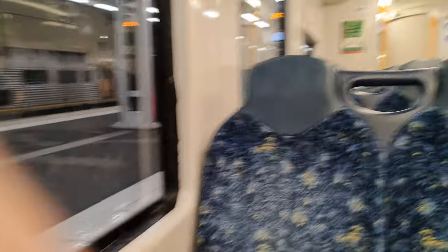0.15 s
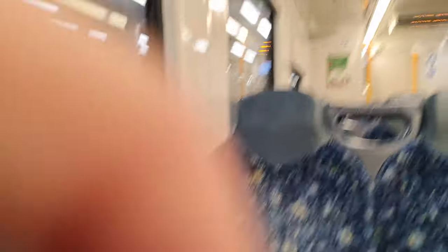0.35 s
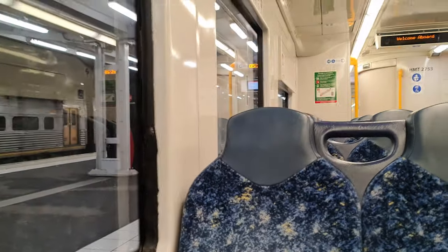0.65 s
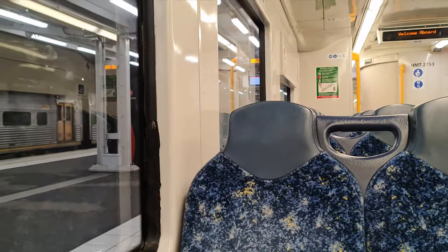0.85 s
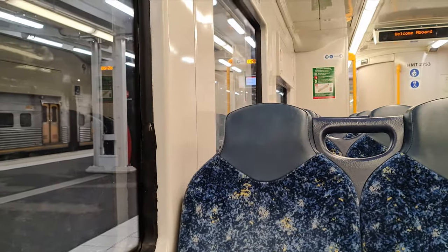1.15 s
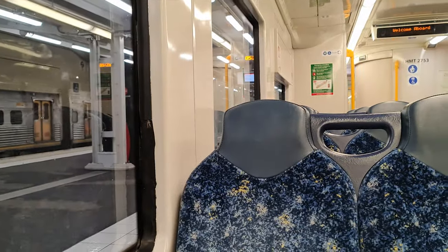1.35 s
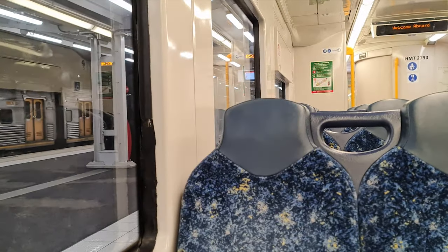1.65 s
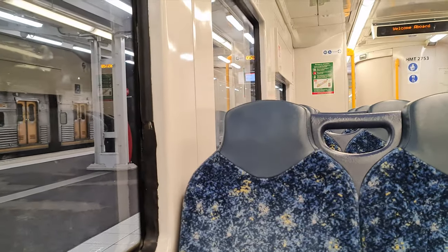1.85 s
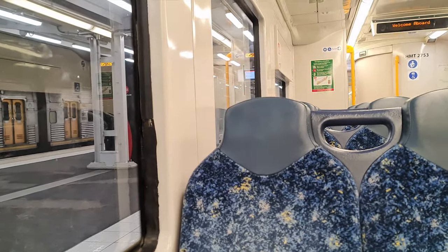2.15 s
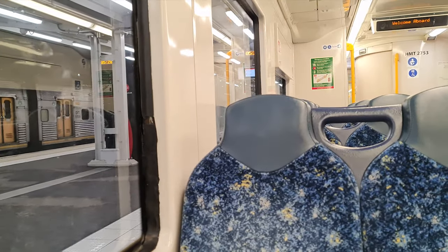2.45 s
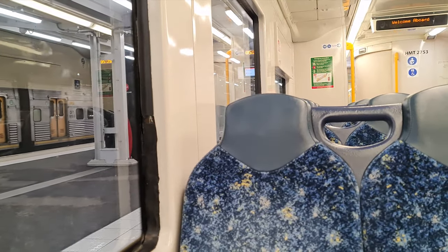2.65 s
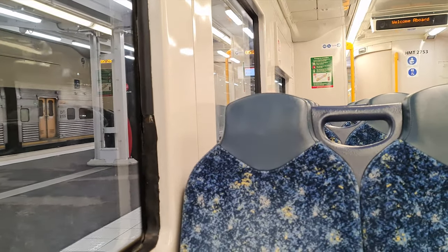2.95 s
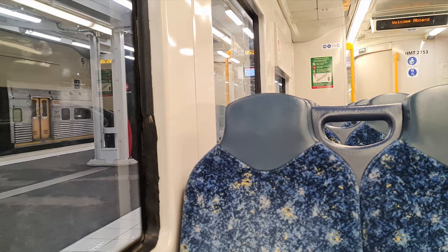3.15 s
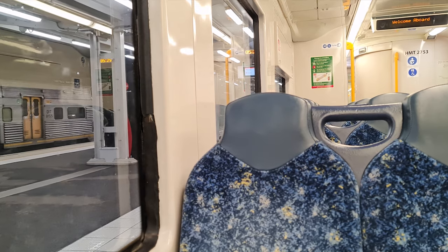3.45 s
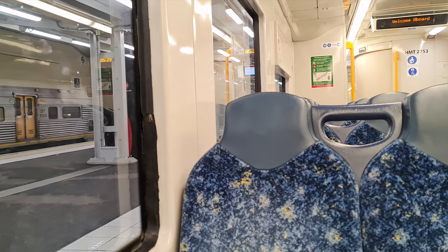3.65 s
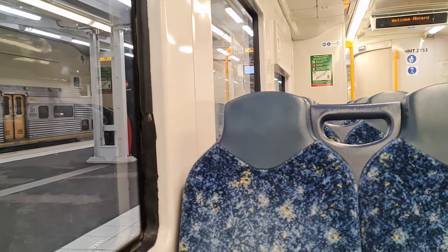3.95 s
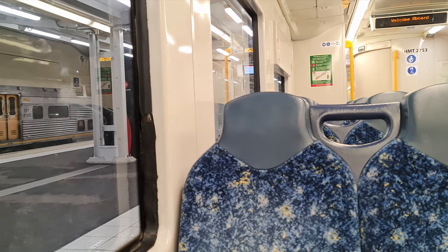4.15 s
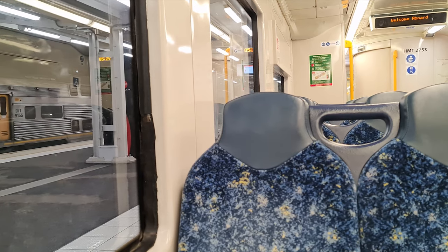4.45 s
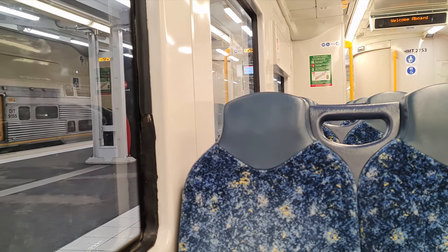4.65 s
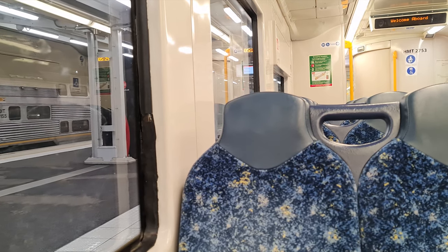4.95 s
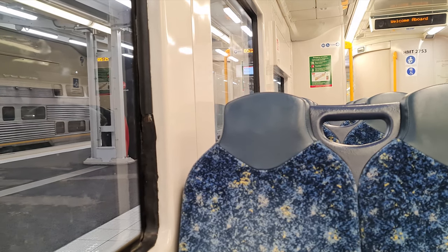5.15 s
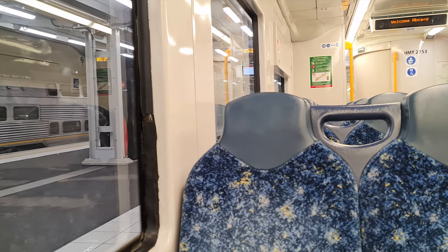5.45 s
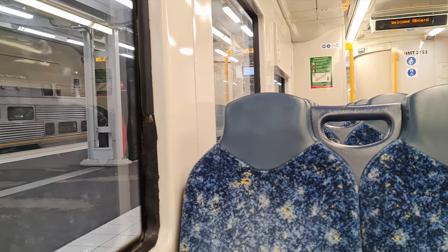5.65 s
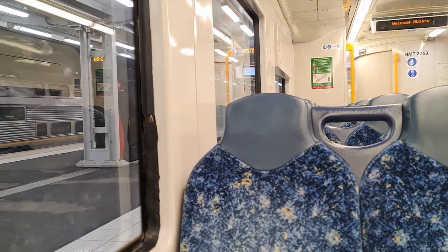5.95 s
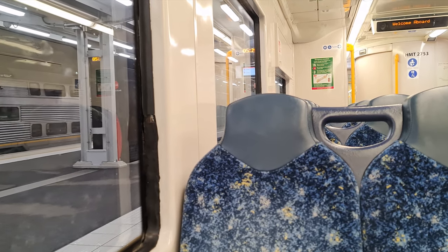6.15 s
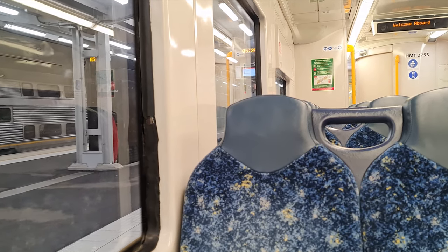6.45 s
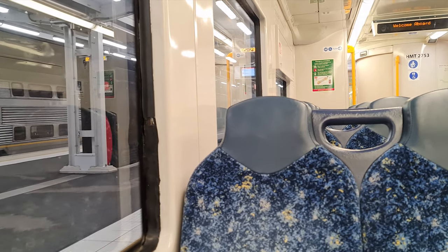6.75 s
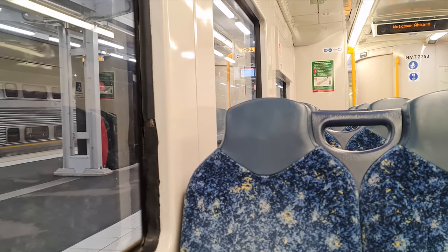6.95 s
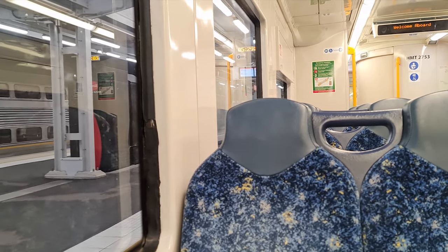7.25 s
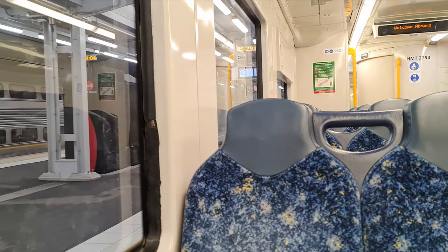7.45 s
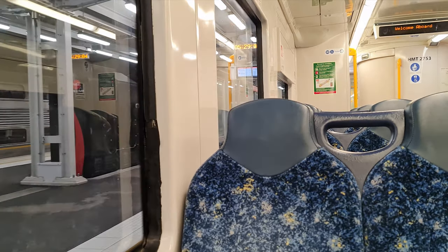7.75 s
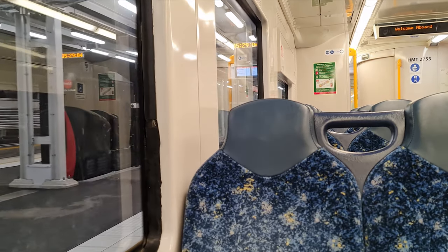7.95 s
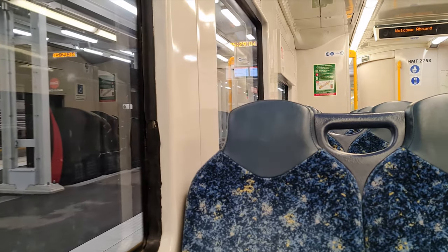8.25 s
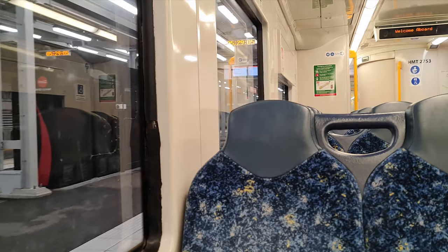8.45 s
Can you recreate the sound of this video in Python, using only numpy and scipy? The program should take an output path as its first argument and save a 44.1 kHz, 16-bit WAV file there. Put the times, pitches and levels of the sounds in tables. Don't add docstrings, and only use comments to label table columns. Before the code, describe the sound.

A diesel railcar idles with a lumpy low rumble, bogs briefly, then revs into a steady loud drone, ending on a short air-valve blast.

```python
import sys
import numpy as np
from scipy import signal
from scipy.fft import rfft, irfft
from scipy.io import wavfile
from scipy.ndimage import uniform_filter1d

SR = 44100
rng = np.random.default_rng(int(sys.argv[2]) if len(sys.argv) > 2 else 0)


def natural_amplitude(level_db):
    exponent = np.asarray(level_db, float) / 20
    return 10 ** exponent


def store_pcm(level_fs):
    pcm = np.round(np.clip(level_fs, -1, 1) * 32767).astype(np.int16)
    wavfile.write(sys.argv[1], SR, np.atleast_2d(pcm).T)


N = 378378
T = np.arange(N) / SR
HZ = np.maximum(np.arange(N // 2 + 1) * SR / N, 1)
VALVE_S = 8.353


def curves(rows):
    s, *columns = np.transpose(rows)
    return [np.interp(T, s, column) for column in columns]


def along(rows, hz=HZ):
    f, value = np.transpose(rows)
    return np.interp(np.log(hz), np.log(np.maximum(f, 1)), value)


def ramp(s, length):
    return np.clip((T - s) / length, 0, 1)


def swells(rows):
    return sum(natural_amplitude(db) * np.exp(-((T - s) / half) ** 2) for s, db, half in rows)


def fade(s, attack, t60):
    i = np.arange(int(s * SR), min(N, int((s + attack + t60) * SR)))
    t = i / SR - s
    return i, np.clip(t / attack, 0, 1) * natural_amplitude(-60 * np.maximum(t - attack, 0) / t60)


def walk(rate):
    k = int(SR / rate)
    steps = np.repeat(rng.standard_normal(N // k + 1), k)
    w = uniform_filter1d(uniform_filter1d(steps, k), k)[:N]
    return w / w.std()


def hump(hz, width):
    return 1 / np.sqrt(1 + ((HZ - hz) * 2 / width) ** 2)


def pan(db):
    return natural_amplitude(np.array([db / 2, -db / 2])).reshape(2, -1)


# frequency in Hz, likeness from 0 to 1.
PORTS_ALIKE = [(60, 1), (130, 0.97), (290, 0.93), (640, 0.33), (1410, 0.46), (3100, 0.06), (6820, -0.0),
               (15000, 0.04)]
# frequency in Hz, lead in radians.
LEFT_LEAD = [(0, 0.18), (780, 0.21), (1290, 2.01), (1550, 3.7), (3190, 9.5), (4570, 8.5), (6200, 16),
             (8100, 33), (9130, 35), (10200, 25), (10400, 25), (11500, 39), (14500, 19.5), (15500, 18)]
# frequency in Hz, left minus right in dB.
LEFT_TILT = [(60, 2), (110, 2.5), (200, 8.5), (380, -1.5), (700, 0), (1290, 1), (2380, 2.5), (4400, -3.5),
             (8120, -3.5), (15000, -1.5)]


def white():
    shared, own = rfft(rng.standard_normal((2, N)))
    alike = np.clip((along(PORTS_ALIKE) - .3) / 0.73, 0, 1) ** .5
    right = (alike * shared + np.sqrt(1 - alike ** 2) * own) * np.exp(-1j * along(LEFT_LEAD))
    return np.array([shared, right]) * natural_amplitude(np.outer([.5, -.5], along(LEFT_TILT)))


def noise(gain):
    x = irfft(white() * gain, N)
    return x / x.std()


# time in seconds, cylinder firings per second in Hz.
SPEED = [(0, 42.45), (1.9, 42.45), (2.2, 42.75), (2.5, 42.5), (2.9, 42.4), (3.3, 41.4), (3.65, 40.42),
         (3.8, 42.15), (3.9, 45.42), (4.2, 53.4), (4.6, 59.7), (4.75, 61.05), (5.05, 62.6), (5.4, 62.8),
         (5.8, 62.27), (6.1, 62.4), (6.8, 62.5), (8.58, 62.47)]
# time in seconds, shaking of the floor in dB.
SHAKE = [(0, -12), (.3, 4.5), (.6, -0.5), (.95, 2.5), (1.25, -4.5), (1.5, 6.5), (1.8, -10), (2.15, 3.5),
         (2.5, -1.5), (3.45, 3), (3.7, -11), (4.25, 2.5), (4.45, -0.5), (4.53, -5), (4.97, -1),
         (5.22, -6.5), (5.45, -2.1), (8.58, -1.5)]
# level in dB of the firing rate, its double and its triple.
IDLE_FIRING_DB = (-40.5, -35, -41)
PULL_FIRING_DB = (-17.5, -31, -35.5)
SHAKEN_SHARES = (1.0, 0.55, .2)
# multiple of the whole-cycle rate, level in dB.
IDLE_ORDERS = [(1, -46), (2, -39), (3, -30), (4, -18), (5, -12), (7, -14), (8, -3), (9, 3), (10, 2.5),
               (11, -8), (13, -16), (14, -27), (15, -15), (16, -19), (17, -14), (19, -21), (20, -19),
               (21, -19), (22, -29), (23, -27), (24, -16), (25, -27), (26, -30), (27, -27), (28, -22),
               (30, -29), (34, -30), (38, -31), (39, -32), (46, -24)]
PULL_ORDERS = [(2, -35), (3, -13), (4, -30), (5, -6), (7, -18), (8, -18), (9, -17), (10, -25), (11, -24),
               (13, -24), (14, -13), (15, -26), (16, -21), (17, -27), (19, -32), (20, -25), (23, -36),
               (24, -25), (26, -40), (27, -29), (28, -25), (30, -23), (32, -31), (33, -31), (34, -33),
               (36, -31), (38, -33)]
# multiple of the whole-cycle rate, level in dB.
GEAR_ORDERS = [(42, -28), (45, -32), (46, -31), (48, -37), (52, -40), (54, -40), (57, -39), (58, -38),
               (60, -40), (68, -38), (72, -37), (76, -42), (78, -37), (81, -32), (84, -40), (90, -43),
               (94, -41), (99, -43), (102, -46), (114, -45), (123, -45), (126, -46), (141, -44), (144, -48),
               (162, -46), (164, -42), (165, -41), (166, -43), (169, -44)]


def engine():
    sparse = 10
    idle_lump_db, pull_lump_db, asleep_db = -30.5, -20.5, -31
    idle_turns, idle_lag, pull_turns = .41, .25, .24
    rock_lag = .6
    floor_hz, floor_half_width_hz = 67, 4
    throttle_s = 3.68

    hz, shake_db = curves(SPEED)[0], curves(SHAKE)[0]
    cycle = 2 * np.pi * np.cumsum(hz) / (6 * SR)
    load, punch, bark = ramp(throttle_s, 1), ramp(3.88, 0.18), ramp(3.75, .25)
    turning = cycle, load
    bog_db = -15 * np.exp(-((T - 3.45) / 0.21) ** 2)
    miss_db = -11 * np.exp(-((T - 3.91) / .06) ** 2)
    slack_db = -15 * (1 - ramp(5.05, 0.14))
    idle_db = miss_db + idle_lump_db + asleep_db * ramp(4.1, 0.72)
    pull_db = miss_db + shake_db + pull_lump_db + asleep_db * (1 - ramp(throttle_s, 0.19))
    firing_db = [idle + bog_db + (share * shake_db + pull - idle) * rise
                 for idle, pull, share, rise
                 in zip(IDLE_FIRING_DB, PULL_FIRING_DB, SHAKEN_SHARES, (punch, bark, bark))]
    scatter = [walk(4) for _ in range(8)]
    paths = rng.uniform(-np.pi, np.pi, 200) * (np.arange(200) > 12)

    signals = np.array([hz, cycle, idle_db, pull_db, shake_db, slack_db, bog_db])
    hz, cycle, idle_db, pull_db, shake_db, slack_db, bog_db = signals[:, ::sparse]
    firing_db, scatter = np.array(firing_db)[:, ::sparse], np.array(scatter)[:, ::sparse]

    def line(k, db, turns, lag, wobble_db):
        k = int(round(k))
        angle = k * cycle - 2 * np.pi * (k * turns + lag)
        angle = angle + paths[k] * (k % 6 > 0) + .1 * scatter[(k + 3) % 8]
        return np.sqrt(2) * natural_amplitude(db + wobble_db * scatter[k % 8]) * np.cos(angle)

    def detune(k):
        return (k * hz / 6 - floor_hz) / floor_half_width_hz

    def boom_db(k, index):
        return 10 * np.log10((1 + detune(k)[index] ** 2) / (1 + detune(k) ** 2))

    casing_db = -150 * np.clip(1 - hz / hz[-1], 0, 1)

    def path_db(k):
        if k < 6:
            return slack_db * (6 - k) / 3
        if k < 10:
            return .6 * boom_db(k, index=-1)
        return .6 * casing_db

    out = sum(line(6 * (k + 1), db, pull_turns, 0, .5) for k, db in enumerate(firing_db))
    for k, db in IDLE_ORDERS:
        level_db = db + idle_db + (1 if k > 8 else .6) * boom_db(k, index=0)
        level_db = level_db + shake_db * (k in (9, 10)) + 0.71 * bog_db * (k == 9)
        out += line(k, level_db, idle_turns, idle_lag + np.arctan(detune(k)) / (2 * np.pi), 1.5)
    for k, db in PULL_ORDERS:
        out += line(k, db + pull_db + path_db(k), pull_turns, rock_lag * (k < 4), 0.61)
    for k, db in GEAR_ORDERS:
        out += line(k, db + pull_db + casing_db, 0, 0, 2.5)
    drone = signal.resample_poly(out, sparse, 1, window=("kaiser", 10), padtype="antireflect")[:N]
    return drone * pan(-.2), *turning


# frequency in Hz, level in dB per Hz.
IDLE_ROAR = [(12, -41.5), (25, -17), (45, -4), (64, 6), (100, -5), (220, -13.5), (500, -18), (1000, -25),
             (1600, -27), (2300, -34.5), (3300, -40.5), (4200, -50.5), (6500, -67), (11800, -71),
             (12200, -115)]
PULL_ROAR = [(12, -47), (25, -23), (60, 1), (100, -3), (220, -16), (500, -18.5), (1000, -26), (1600, -24.5),
             (2300, -33.5), (3300, -39), (4200, -54), (6500, -71.5), (10800, -67), (12200, -115)]
# frequency in Hz, width in Hz, boost in dB.
PANELS = [(337, 33, 3), (800, 99, 2.5), (954, 39, 3.5), (1350, 60, 2), (1726, 46, 5), (3020, 89, 2)]
# time in seconds, effort in dB.
EFFORT = [
    (0, -1),
    (2.8, -0.5),
    (3.5, -1.5),
    (4.1, 0.5),
    (4.7, 2),
    (5.3, 1),
    (5.8, 0.5),
    (8.58, -.5),
]


def roar(cycle, load):
    panels = np.prod([1 + (natural_amplitude(db) - 1) * hump(f, w) ** 2 for f, w, db in PANELS], axis=0)
    out, swell = 0, walk(0.54)
    for colour, db, share in ((IDLE_ROAR, -29, 1 - load), (PULL_ROAR, -30, load)):
        spectrum, layer = white() * natural_amplitude(along(colour)) * panels, 0
        for octave in range(4, 15):
            band = np.cos(np.pi / 2 * np.clip(np.log2(HZ) - octave, -1, 1))
            layer = layer + irfft(spectrum * band, N) * natural_amplitude(0.3 * swell + 1.0 * walk(6))
        out = out + layer / layer.std() * natural_amplitude(db) * np.sqrt(share)
    throb = 1 + .07 * np.cos(6 * cycle)
    return out * natural_amplitude(curves(EFFORT)[0]) * throb


# frequency in Hz, level in dB per Hz.
JET = [(1180, -33), (2000, -12.5), (2480, -4.5), (2700, -5.5), (3380, -5), (4150, 2), (4680, 0),
       (5060, -6.5), (6010, -12.5), (7010, -21), (9000, -9), (11100, -12), (15100, -13), (15600, -21.5)]


def valve():
    def blow(db, rise, t60):
        fall_db = -60 * np.maximum(T - VALVE_S - rise, 0) / t60
        return ramp(VALVE_S, rise) ** 2 * natural_amplitude(db + fall_db)

    pipe_modes = hump(660, 120.) + 0.7 * hump(830, 120.) + 0.83 * hump(1300, 1700.0)
    pipe = noise(pipe_modes * hump(0, 5600.0) ** 2)
    jet = white() * natural_amplitude(along(JET))
    top = 1 - hump(0, 24000.) ** 6
    dulling = natural_amplitude(-110 * np.clip(T - 8.42, 0, 1))
    jet = (irfft(jet * (1 - top), N) + dulling * irfft(jet * top, N)) / irfft(jet, N).std()
    leak = natural_amplitude(-51) * ramp(8.337, .005)
    return pan(.3) * ((blow(-26, 0.014, 0.57) + leak) * jet + blow(-23, 0.02, 0.48) * pipe)


# time in seconds, peak in dB.
CHIRPS = [
    (0.1694, -63),
    (0.2394, -55),
    (0.3386, -49),
    (0.4344, -58),
    (0.5207, -59),
    (0.6185, -59),
    (0.7238, -67),
    (0.9194, -69),
    (0.9994, -80),
    (1.0794, -77),
]
# time in seconds, peak in dB, how early the rubber slips in seconds.
SQUEAK = [
    (4.4, -83.5, 0.017),
    (4.7, -64.5, 0.028),
    (5.0, -67, 0.032),
    (5.35, -55.5, 0.015),
    (6.1, -59.5, 0.0084),
    (6.8, -63, 0.008),
    (8.3, -60.5, 0.0073),
]
# time in seconds, level in dB, half length in seconds.
LOW_STRAND = [
    (5.25, 0.09, 0.27),
]


def chirps(cycle):
    hop_s, in_step_s = 5.19, 7.232
    out, hopped = np.zeros((2, N)), T > hop_s
    hz = np.where(hopped, 10420 - 170 * ramp(hop_s, .9), 9250 + 45 * T)
    share = np.where(hopped, 0.59, 0.045)
    whisper_db = np.where(hopped, -90, -87)
    angle = 2 * np.pi * np.cumsum(hz + 90 * (1.2 - share / .6) * walk(11)) / SR
    upper = noise(hump(0, 390.) ** 3) * np.cos(angle)
    partner = noise(hump(0, 360.) ** 3) * np.cos(angle - 2 * np.pi * 520 * T)
    tone = upper + share * partner
    tone += swells(LOW_STRAND) * noise(hump(9230, 250.) ** 3)

    peak_db, early = curves(SQUEAK)
    turns = np.floor((cycle - cycle[int(in_step_s * SR)]) / (2 * np.pi))
    shakes = np.flatnonzero((np.diff(turns) > 0) & (T[1:] > SQUEAK[0][0]) & (T[1:] < VALVE_S))
    scatter_db = 1 * rng.standard_normal(N // 2000)
    in_step = [(T[i] - early[i], peak_db[i] + scatter_db[i // 2000]) for i in shakes]
    for s, db in list(CHIRPS) + in_step:
        for lag, rebound_db in ((0, -4.5), (.03, -19.5)):
            i, env = fade(s + lag, 0.0076, 0.18)
            hold = 1 - np.clip((T[i] - s - 0.054) / .025, 0, .9)
            out[:, i] += natural_amplitude(db + rebound_db) * env * tone[:, i] * hold
    return out + upper * natural_amplitude(whisper_db + 3.5 * walk(9.9) + 6.7 * np.cos(cycle))


# frequency in Hz, width in Hz, level in dB.
TRIM = [(2500, 25, -11), (2950, 150, -1), (3200, 90, -4), (3580, 120, -12), (4050, 150, -16)]
# time in seconds, peak in dB, half length in seconds.
FITS = [
    (4.62, -67, 0.27),
    (5.05, -62.5, 0.18),
    (5.8, -70.5, 0.16),
    (6.05, -68, 0.11),
]
# time in seconds, slap in dB, ring after it in dB.
RATTLES = [(4.54, -58, -63), (4.637, -57, -57), (4.735, -62, -56), (4.833, -56, -64), (4.934, -44.5, -62),
           (5.03, -55.5, -49), (5.13, -64, -58), (5.23, -66, -68), (5.66, -62, -67.5), (5.82, -62, -64),
           (5.914, -54, -59.5), (6.008, -50, -57), (6.107, -54, -57), (6.2, -58, -64.5)]
# frequency in Hz, time in seconds, peak in dB,
SINGING = [
    (2510, 6.1, -59, 0.17),
    (2500, 5.5, -60, .06),
    (2700, 4.2, -61, .1),
    (1920, 5.47, -53.5, .1),
    (1910, 4.85, -57.5, .06),
    (1930, 5.3, -58, .1),
    (250, 4.7, -44, 0.081),
    (315, 4.2, -42.5, 0.15),
    (253, 4.6, -46, .1),
]


def trim(load):
    modes = sum(natural_amplitude(db + 3 * walk(8)) * noise(hump(f, w) ** 2) for f, w, db in TRIM)
    out = (natural_amplitude(-72) * load + swells(FITS)) * modes
    out += load * natural_amplitude(-60.5 + 2.1 * walk(9)) * noise(hump(1720, 40.) ** 2)
    slap = noise(hump(2980, 160.) ** 2 + 0.41 * hump(2400, 250.) ** 2)
    ring = noise(hump(3210, 30.) ** 2)
    for s, slap_db, ring_db in RATTLES:
        for db, sound, rise, t60 in ((slap_db, slap, .006, .3), (ring_db, ring, .025, .35)):
            i, env = fade(s, rise, t60)
            out[:, i] += natural_amplitude(db) * env * sound[:, i]
    return out + sum(swells([row]) * noise(hump(hz, 16.0) ** 2) for hz, *row in SINGING)


# time in seconds, peak in dB, frequency in Hz, ring in seconds, left minus right in dB.
TICKS = [(0.2532, -44, 5700, 0.005, 4.5), (0.2532, -40, 3000, 0.005, 4.5), (0.2803, -45, 4700, 0.01, -6.0),
         (0.3564, -50, 5800, 0.005, 15.0), (5.0888, -42, 4800, 0.008, -2.0),
         (0.3172, -36, 2800, 0.005, 3.5), (0.553, -35, 3000, 0.005, 5.0), (0.6642, -33, 3000, 0.004, 7.0),
         (0.7019, -37, 2400, 0.005, 2.0), (1.0452, -23, 2100, 0.005, 4.5), (1.1514, -34, 1800, 0.006, 1.0),
         (0.599, -14.5, 760, 0.013, 2.5), (0.599, -19, 1150, 0.008, 2.5), (0.599, -31, 3200, 0.004, 2.5)]


def ticks():
    out, crack = np.zeros((2, N)), noise(hump(2300, 3200.) ** 3)
    for s, db, hz, ring_s, side_db in TICKS:
        i, env = fade(s, .45 / hz, ring_s)
        ring = .7 * np.sin(2 * np.pi * hz * (T[i] - s))
        out[:, i] += natural_amplitude(db) * pan(side_db) * env * (ring + .6 * (hz / 4500) ** 3 * crack[0, i])
    return out


# time in seconds, peak in dB, tail in seconds, left minus right in dB.
KNOCKS = [
    (2.173, -50, 0.25, 0),
    (2.834, -44, 0.33, -1.5),
    (4.0522, -43.5, 0.18, 1),
    (4.108, -54.5, 0.23, -5),
    (4.6594, -59, 0.58, -3),
    (4.9342, -51, 0.13, 7),
    (5.0388, -50, 0.55, 0),
    (8.067, -53.5, 0.2, -0.5),
    (8.1646, -54, 0.28, -7),
]
# frequency in Hz, level in dB per Hz.
KNOCK_COLOUR = [(1470, -32.5), (2500, -0.5), (4430, -5.5), (5830, -11), (6640, -21), (9660, -18),
                (15500, -36.5)]


def knocks():
    out, smear = np.zeros((2, N)), noise(natural_amplitude(along(KNOCK_COLOUR)))
    for s, db, tail, side_db in KNOCKS:
        i, env = fade(s, 0.014, tail)
        out[:, i] += natural_amplitude(db - 3.0) * pan(side_db) * env * smear[:, i]
    return out


# time in seconds, peak in dB, frequency in Hz, width in seconds.
THUD = (.044, -10, 40, .02)


def bump():
    s, db, hz, width = THUD
    return natural_amplitude(db) * pan(-10.5) * np.exp(-((T - s) / width) ** 2) * np.cos(2 * np.pi * hz * (T - s))


# peak in seconds, rise in seconds, fall in seconds, rub in dB,
# left minus right in dB.
RUBS = [
    (.005, 0.017, 0.073, -47.5, -1.8),
    (.09, 0.14, 0.12, -57.5, -10.5),
    (.15, 0.056, 0.038, -50, -4),
    (.27, 0.14, .1, -64, 7),
    (.342, 0.048, 0.05, -61.5, 11.5),
    (.39, 0.044, 0.1, -53.5, 14),
    (.43, 0.036, 0.021, -50, 14.5),
    (.56, 0.009, 0.072, -57, 9.5),
    (0.593, 0.054, 0.018, -54, 15),
]
# frequency in Hz, level in dB per Hz.
RUB_COLOUR = [(1000, -21), (2000, -5.5), (3000, 4.5), (4500, -3.5), (7500, -13.5), (9300, -7.5),
              (12000, -15.5), (15600, -20)]
# time in seconds, peak in dB, half length in seconds.
PRESS = [
    (.4, -53, 0.02),
    (.428, -40.5, 0.01),
]
# time in seconds, peak in dB, half length in seconds.
GRAB = [
    (.012, -35.5, .025),
    (.06, -43, 0.024),
]


def rubs():
    grain = natural_amplitude(1.5 * walk(400))
    skin = noise(natural_amplitude(along(RUB_COLOUR)))
    scrape = noise(hump(220, 850.0) * hump(0, 8000.0) ** 2 * (HZ / (HZ + 120)) ** 2)
    out = natural_amplitude(-26.5 - 60 * (T / 0.54 + ramp(0.19, 0.034))) * scrape
    for s, rise, fall, db, side_db in RUBS:
        away = np.maximum((s - T) / rise, (T - s) / fall)
        stroke = natural_amplitude(db - 27 * away ** 2) * (away < 1)
        out = out + pan(side_db) * stroke * (skin + natural_amplitude(2.5) * scrape)
    press = pan(16.4) * swells(PRESS) * noise(hump(1800, 3300.0) ** 3)
    grab = pan(-4.5) * swells(GRAB) * noise(hump(600, 900.) ** 2)
    return grain * (out + press + grab)


# frequency in Hz, level in dB.
FAN = [(247.1, -56), (312, -50), (494.3, -61), (538, -60), (741.5, -53.5), (988.6, -53), (1235.7, -67),
       (1483, -71), (1977.2, -70)]


def fan():
    out, turn = 0, .25 * walk(5)
    for f, db in FAN:
        drift = np.array([0 * T, 0.31 * walk(8)]) * min(f / 900, 1)
        late = np.outer([0, -1], along(LEFT_LEAD, f))
        angle = 2 * np.pi * f * T + turn * f / 400 + drift + late
        out = out + np.sqrt(2) * natural_amplitude(db + 1.0 * walk(2.5)) * np.cos(angle)
    return out


# time in seconds, peak in dB, half length in seconds.
FLUTTER = [
    (1.7, -93.5, 0.45),
    (5.8, -91, 0.48),
    (6.55, -80.5, 0.22),
    (7.45, -89.5, 0.26),
]


def flutter():
    out, puffs = 0, 2.5 * walk(14)
    for hz, db in ((11200, 0.0), (12300, -1), (13500, -6.5)):
        out = out + natural_amplitude(db + puffs + 3.0 * walk(22)) * noise(hump(hz, 1500.) ** 4)
    return swells(FLUTTER) * out


# time in seconds, peak in dB, half length in seconds.
GUSTS = [
    (.27, -65.5, 0.11),
    (1.7, -70, 0.48),
    (2.6, -70, 0.65),
    (3.98, -68, 0.2),
    (4.95, -67.5, 0.53),
    (5.8, -72, 0.53),
    (6.6, -65, .25),
    (7.5, -70.5, 0.71),
    (8.35, -69.5, 0.27),
]
# frequency in Hz, level in dB per Hz.
HISS_COLOUR = [(2000, -27), (3500, 2), (4500, 1.5), (6000, -4), (7000, -23.5), (11000, -15.5), (14000, -41)]


def hiss():
    return (natural_amplitude(-79.5) + swells(GUSTS)) * noise(natural_amplitude(along(HISS_COLOUR)))


def scene():
    drone, cycle, load = engine()
    machine = drone + roar(cycle, load) + valve() + chirps(cycle) + trim(load)
    handling = ticks() + knocks() + bump() + rubs()
    return machine + handling + fan() + flutter() + hiss()


def low_pass(x):
    return signal.sosfilt(signal.butter(12, 15910, fs=SR, output="sos"), x)


def record(dry):
    cut = signal.ellip(8, .2, 70, 15700, fs=SR, output="sos")
    stop = 1 - ramp(T[-1] - .003, .003) ** 2
    return low_pass(signal.sosfilt(cut, dry) * stop)


dry = scene()
out = record(dry)
store_pcm(out)
```